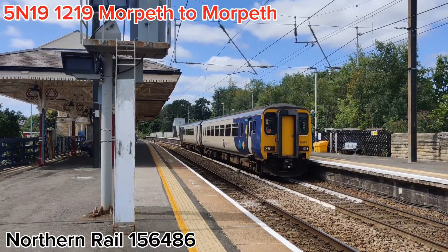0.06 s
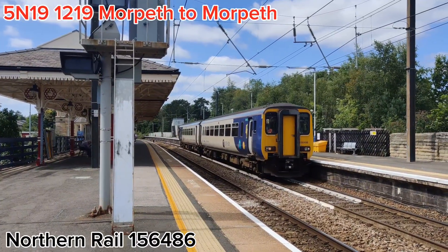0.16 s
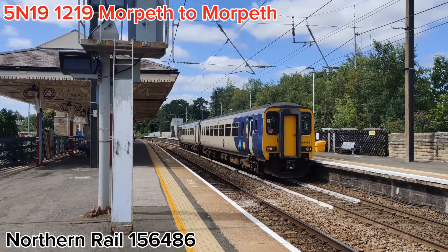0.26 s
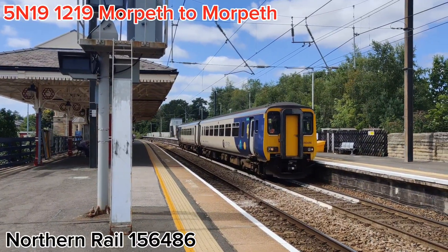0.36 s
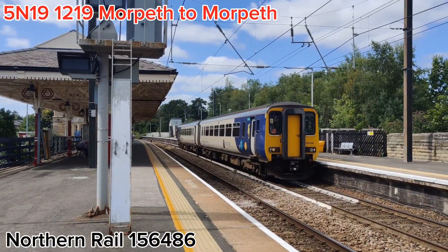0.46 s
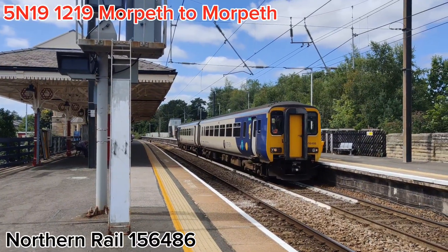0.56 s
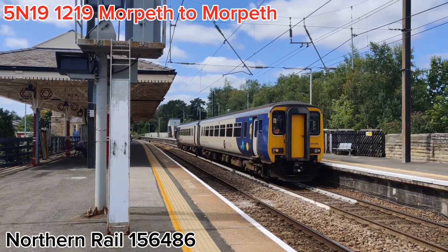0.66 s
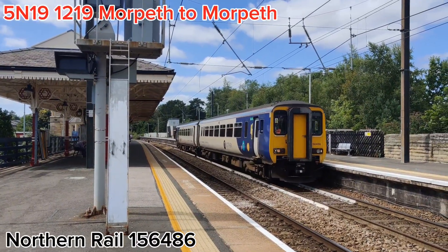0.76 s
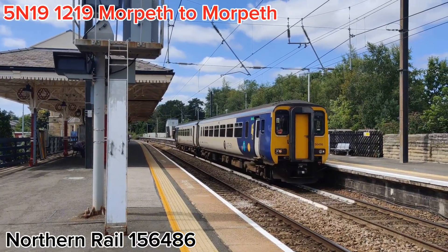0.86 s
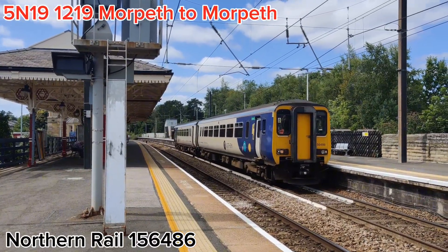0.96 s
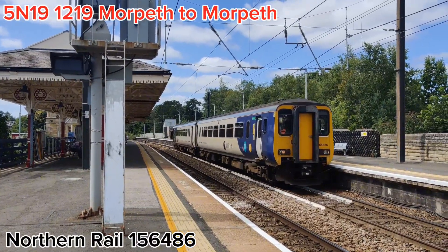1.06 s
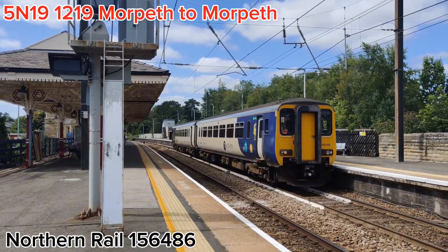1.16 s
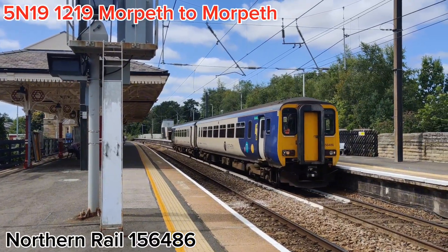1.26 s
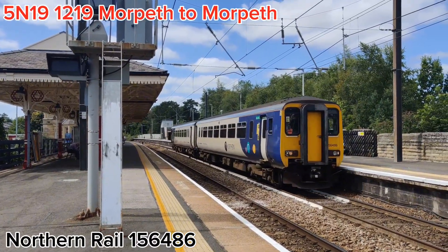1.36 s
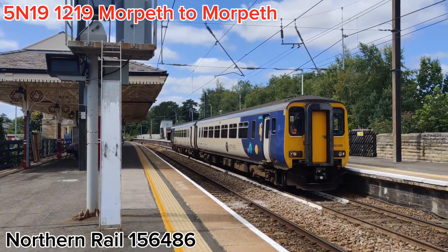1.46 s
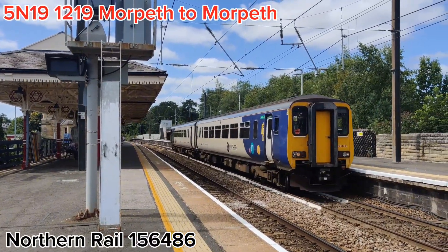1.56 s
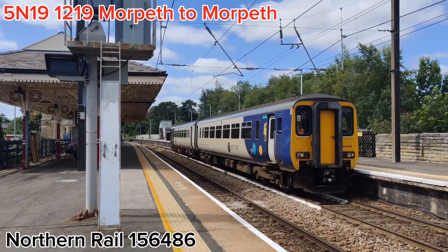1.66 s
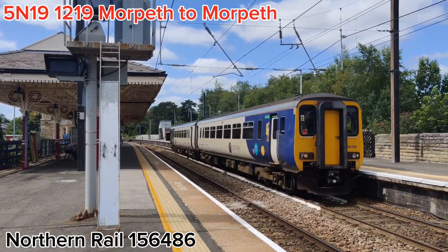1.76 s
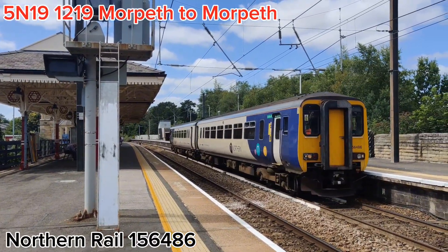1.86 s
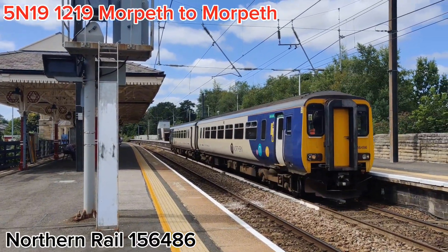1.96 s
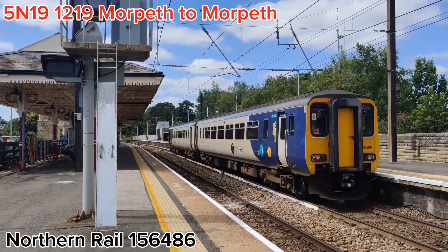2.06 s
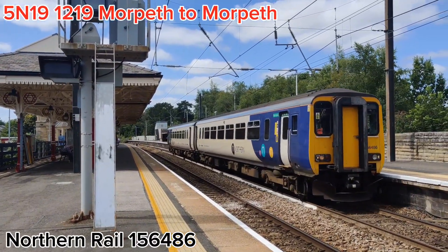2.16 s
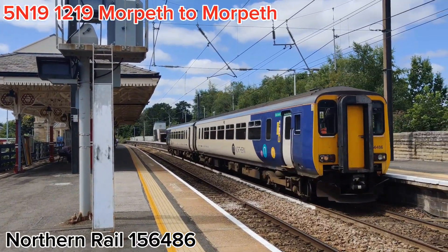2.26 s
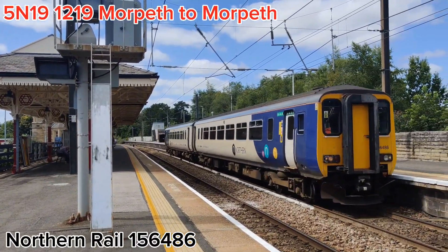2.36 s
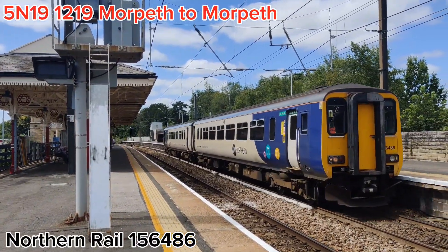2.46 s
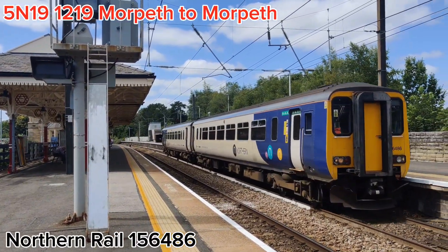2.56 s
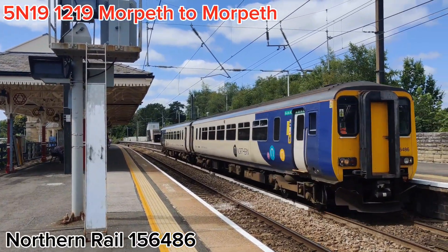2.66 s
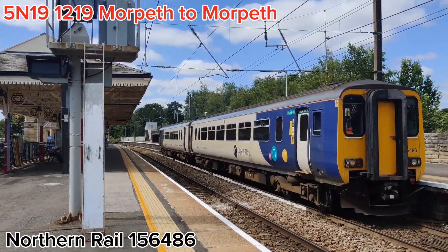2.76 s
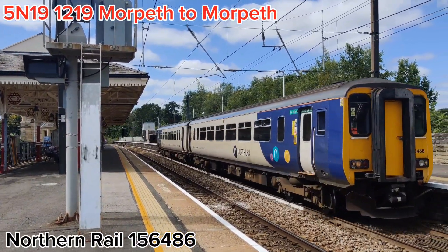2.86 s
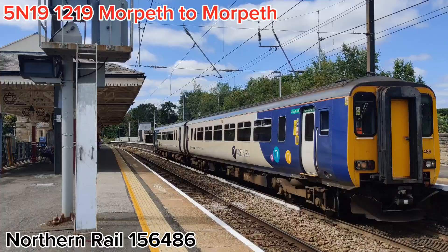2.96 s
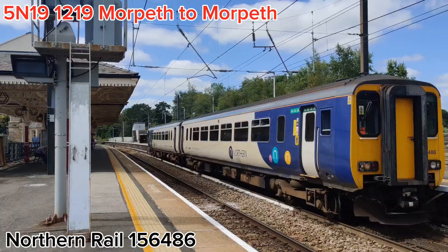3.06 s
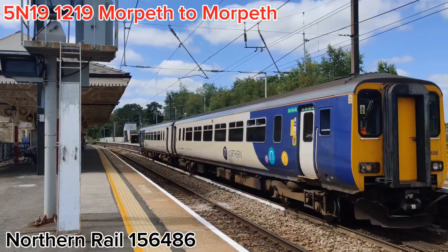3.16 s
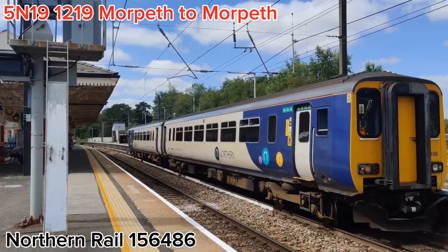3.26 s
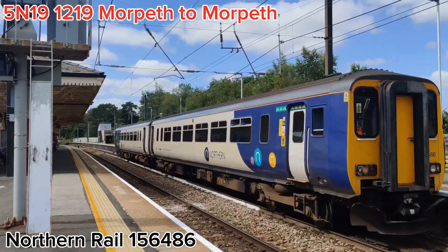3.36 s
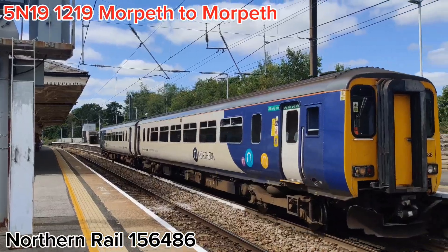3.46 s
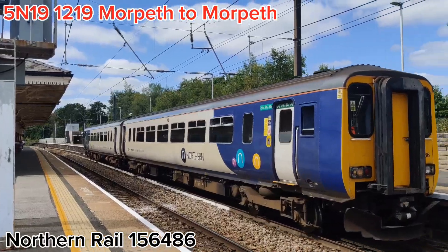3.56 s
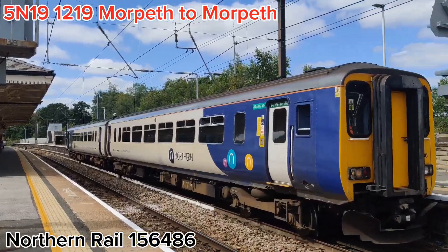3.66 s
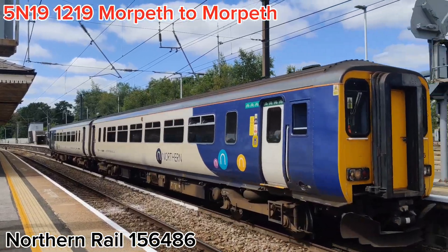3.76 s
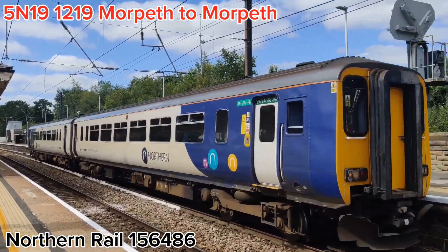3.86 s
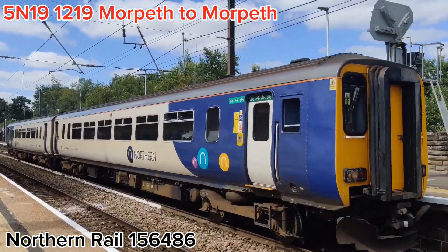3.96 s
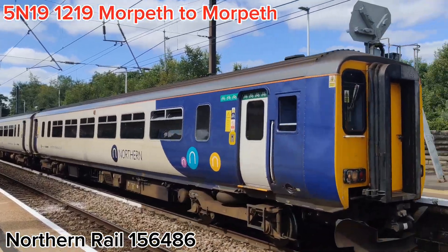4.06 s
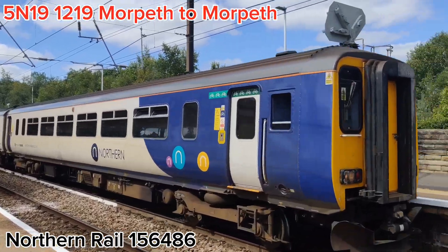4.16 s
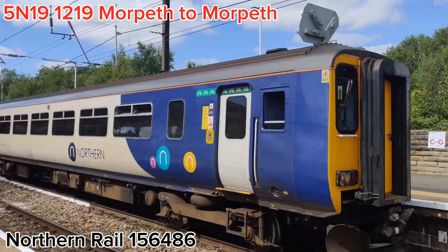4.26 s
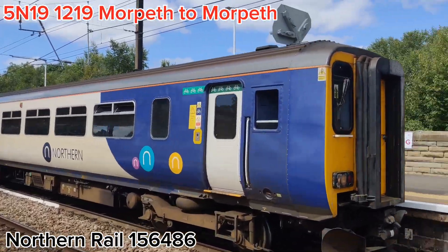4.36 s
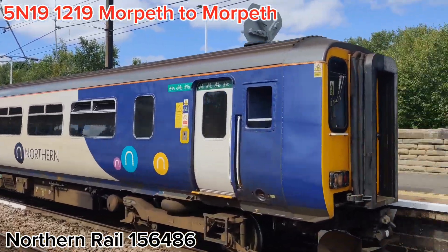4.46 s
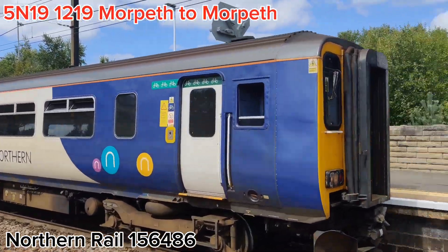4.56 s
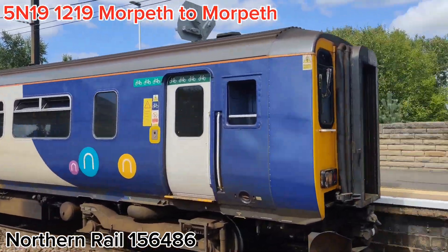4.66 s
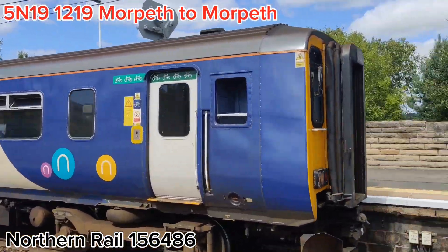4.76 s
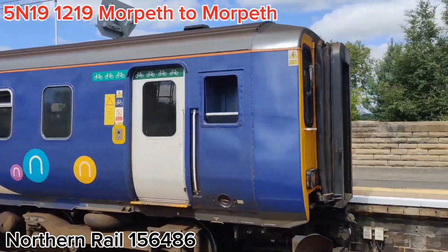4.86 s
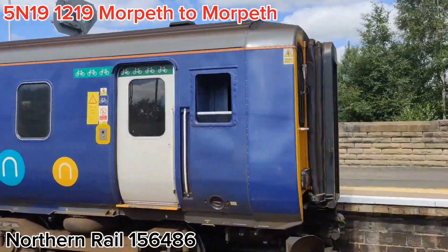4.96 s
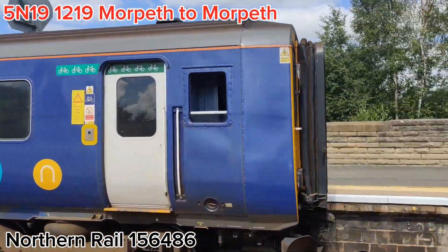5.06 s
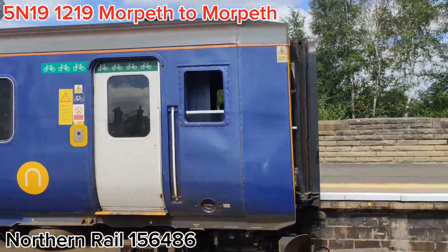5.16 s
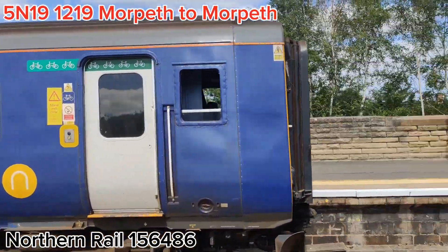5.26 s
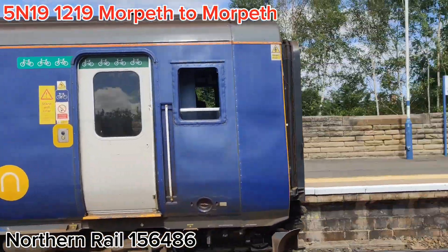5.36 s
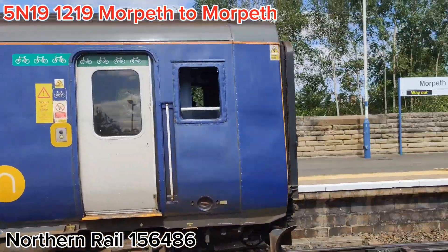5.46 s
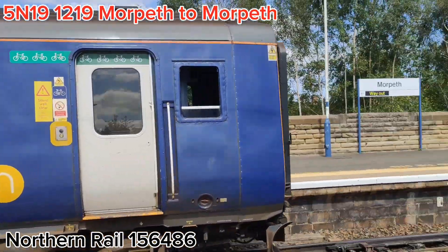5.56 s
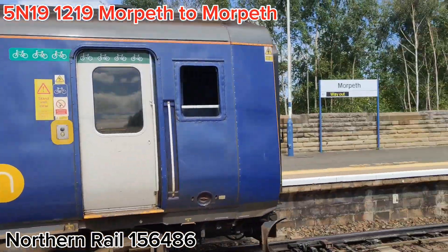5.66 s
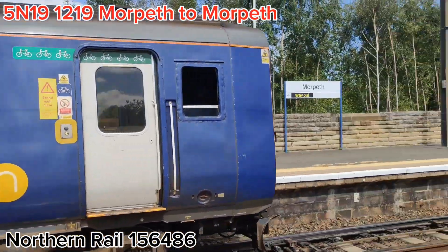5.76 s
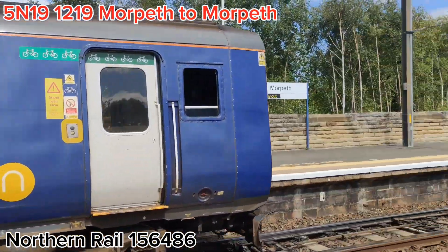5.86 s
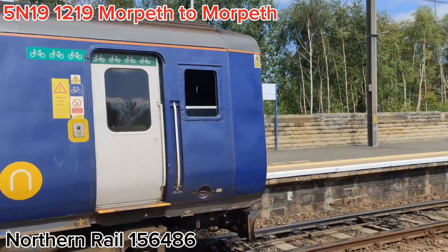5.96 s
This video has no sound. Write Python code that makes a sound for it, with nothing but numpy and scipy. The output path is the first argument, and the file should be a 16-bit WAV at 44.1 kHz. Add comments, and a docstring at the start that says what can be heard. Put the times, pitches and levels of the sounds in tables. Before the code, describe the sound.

A diesel passenger train approaches and slows past an outdoor station platform. Wind buffets the stereo microphone at first, over a roar of wheels on rails and a few faint puffs of air. The engine note sinks and swells into a deep, throbbing drone, joined by thin gear whines. A few sharp metal ticks follow, then a hiss of air and a loud clunk with brief squeaks as the train passes close.

```python
"""A deep, throbbing drone and a roar of wheels on rails: a two-car diesel train slows past a platform.
The throttle closes, so the two exhaust notes sink and beat, and the turbocharger's whistle falls.
The running gear whines, escaping air hisses, metal ticks, and blows under the train make a late clunk.
A breeze buffets the two small microphones, which stand a little apart."""
import sys
import numpy as np
from scipy import signal
from scipy.fft import rfft, irfft
from scipy.io import wavfile
from scipy.ndimage import uniform_filter1d

SR = 44100
rng = np.random.default_rng(int(sys.argv[2]) if len(sys.argv) > 2 else 0)


def materialize(psi):
    """Save the field psi as 16-bit PCM at rate SR to the path in sys.argv[1].

    A 1-D psi becomes a single channel; in a 2-D psi each row is a channel.
    """
    bounded = np.clip(np.atleast_2d(psi).T, -1, 1)
    quanta = np.round(bounded * 32767).astype(np.int16)
    wavfile.write(sys.argv[1], SR, quanta)


N = 265041
T = np.arange(N) / SR

# Tone colour of the breeze, the gusts and the shaking ground: pitch_hz, relative_db
BREEZE_SPECTRUM = [(12, 4), (30, 8), (50, 13.5), (90, 0.5), (160, -24), (400, -60), (1500, -95)]
GUST_SPECTRUM = [(12, -2), (30, 0), (60, -0.5), (120, -5), (200, -9.5), (350, -26.5), (700, -40),
                 (2500, -94)]
GROUND_SPECTRUM = [(15, -43), (33, 0), (42, 2), (58, -6), (75, -4), (105, 1), (135, -10), (300, -59),
                   (900, -97)]
# Strength of the breeze: time_s, left_db, right_db
BREEZE_LEVELS = [(0, -25, -27), (.7, -30, -28), (.85, -29.5, -32), (1.1, -29.5, -27), (1.6, -37, -28.5),
                 (2.5, -36, -37), (3.5, -33, -36), (4.5, -35, -37), (6.01, -52, -42)]
# Gusts that hit one microphone: middle_s, length_s, level_db, side (0 left, 1 right)
GUSTS = [(.01, 0.035, -10, 0), (.04, 0.055, -10, 1), (.085, .06, -16, 0), (.1, .05, -16, 1),
         (.15, .07, -21, 0), (.155, .05, -20, 1), (.22, .1, -16.5, 0), (.245, .07, -18.5, 1),
         (.43, .05, -23, 0), (.42, .08, -20, 1), (.56, .12, -25, 0), (.58, .07, -25, 1),
         (0.729, 0.14, -24, 1), (1.23, .22, -23, 1), (3.232, .073, -19.5, 0), (3.328, 0.14, -14, 0),
         (3.516, 0.087, -14.5, 0), (3.63, 0.15, -17.5, 1)]
# Strength of the ground rumble: time_s, level_db
RUMBLE_LEVELS = [(0, -26.5), (1, -37.5), (2, -38.5), (3, -39.5), (4, -26.5), (5, -31), (5.6, -25.5),
                 (6.01, -26)]

# Tone colour of the far roar, singing rails and front bogie (wheel frame): pitch_hz, relative_db
FAR_SPECTRUM = [(53, -38), (90, -0.5), (280, -4.5), (385, -19.5), (554, -3.5), (832, -10.5), (1030, -9),
                (1120, -9.5), (1360, -8.5), (3410, -21), (4230, -23), (5010, -18.5), (6080, -27.5),
                (14900, -50.5)]
RAIL_SPECTRUM = [(53, -28), (90, 1), (114, -28), (164, -10), (257, -3), (402, -18), (542, -8.5), (780, -15),
                 (1680, -12), (2700, -24), (3490, -25), (3960, -40), (4910, -40), (14900, -65.5)]
BOGIE_SPECTRUM = [(53, -31), (90, -5.5), (167, -4), (246, -12.5), (304, -8), (420, -16), (686, -11),
                  (1010, -16.5), (3340, -25), (4050, -34), (4910, -28.5), (6080, -38.5), (13100, -55.5),
                  (14900, -70)]
# Strength of those three roars: time_s, far_db, rails_db, bogie_db
ROAR_LEVELS = [(0, -37.5, -71, -45), (.5, -33.5, -38, -57), (1.2, -37, -37.5, -41.5),
               (2, -38.5, -35.5, -38), (2.8, -37, -33, -40), (3.6, -35, -32, -38.5), (4.5, -34, -31.5, -31),
               (5.2, -37, -34.5, -26.5), (6.01, -45, -34, -24.5)]
# How alike the roar is at the two microphones: pitch_hz, likeness (0 to 1)
ROAR_LIKENESS = [(60, 1), (290, 0.96), (630, 0.5), (1380, 0.36), (3020, 0.41), (6610, 0.31), (14500, 0.1)]

# Running-gear tones, swells of gear whine, and loose parts squeaking after the clunk:
# start_s, length_s, pitch_hz, wander_width_hz, level_db
RUNNING_GEAR_TONES = [(5.8, 0.38, 2000, 510, -38.5), (5.25, 0.55, 2500, 250, -45.5),
                      (5.4, 1.2, 3600, 39, -59), (4.03, .32, 2800, 8, -49), (4.3, 1.26, 110, 19.7, -35),
                      (4.1, 1.19, 192, 30.8, -37), (2.98, 1, 1240, 40, -47.5), (3.76, .8, 1350, 37, -49),
                      (2.56, 1.1, 3530, 150, -57), (4.25, .95, 3450, 200, -52),
                      (4.3, 1.15, 3230, 50, -53.5), (3.4, 0.46, 4700, 205, -65),
                      (5.05, 0.51, 5000, 300, -56)]
GEAR_WHINE = [(2.8, .45, 1652, 10, -45), (3.17, .6, 1641, 8, -42.5), (3.6, .6, 1636, 8, -46)]
SQUEAKS = [(5.75, .045, 6500, 20, -54), (5.782, .056, 6437, 25, -45.5), (5.797, .1, 5578, 22, -47)]
# Air escaping under the train: start_s, length_s, hiss_db, nozzle_whistle_db
HISSES = [(0.203, 0.082, -49, -80), (.34, 0.079, -50, -80), (.83, 0.3, -55, -71), (1.636, 0.37, -52, -66),
          (2.53, .12, -61, -70), (5.378, 0.53, -42, -54)]
# Tone colour of the air jet: pitch_hz, relative_db
JET_SPECTRUM = [(3000, -19), (5000, 9.5), (7000, 5.5), (10000, -3.5), (12000, -24), (14000, -13),
                (15000, -8)]
# Metal ticks: start_s, level_db, pitch_hz, left_minus_right_db, bright_edge_db
TICKS = [(4.0405, -26, 2600, 4.5, -16), (4.062, -16.5, 2700, 1, -14), (4.0724, -28, 2690, 2.0, -10),
         (4.138, -27, 2500, -2, -16), (4.1574, -21, 2800, 0, -4), (4.2272, -31, 3200, 0, -10),
         (5.8698, -22, 2800, 3.5, -10)]
# The quick blows that make up one clunk: start_s, level_db, brightness_db
CLUNK_BLOWS = [(5.7413, -36.5, 18.5), (5.7467, -26.5, 15.5), (5.751, -11, -3.5), (5.7602, -23.5, 6.5),
               (5.772, -19, 0), (5.792, -29, 2)]
# Ringing notes of the frame under the train: pitch_hz, relative_db, fade_s (time to drop 60 dB)
FRAME_NOTES = [(100, 6.5, 0.08), (137, 4.5, 0.059), (212, -2.5, 0.075), (287, 3.5, 0.046), (450, 1, 0.03),
               (690, 2, 0.035), (880, -3, 0.03), (1320, 2, 0.02), (1730, -2, 0.022), (1980, 7, 0.013),
               (2200, 5, 0.0076), (2450, 3, 0.014), (5250, -24, 0.03)]
# Tone colour of each blow's rattling crack: pitch_hz, relative_db
CRACK_SPECTRUM = [(150, -7), (500, 6), (900, -5), (2300, 5.5), (3200, -4), (5000, -18.5), (8000, -18),
                  (14000, -46)]

# Strength of the turbocharger and of the front exhaust: time_s, level_db
TURBO_LEVELS = [(0, -64.5), (1, -64), (1.3, -69), (1.85, -73), (2, -63), (3, -64.5), (3.4, -80),
                (6.01, -99)]
EXHAUST_LEVELS = [(.4, -46), (1.4, -34.5), (2, -33.5), (2.4, -28.5), (3.05, -24), (3.5, -23), (4.2, -25),
                  (5.1, -29.5), (5.6, -24.5), (6.01, -23.5)]
# Fuzzy extra notes in the exhaust: multiple (of the firing rate), relative_db
EXHAUST_MULTIPLES = [(2 / 3, -10), (3 / 2, -22), (1.5, -35), (1.5, -27), (3.5, -23.5), (6, -28)]

# Resonances of the microphones' small openings: pitch_hz, width_hz, boost_db
MIC_RESONANCES = [(570, 510, 0.5), (3533, 370, 6.5), (4660, 530, 3), (5060, 380, 4.5)]
# How the two microphones differ in tone: pitch_hz, left_minus_right_db
MIC_TILT = [(60, 0), (180, 0.5), (540, 0.5), (1610, 0.5), (4830, 3), (14500, -4)]

THROTTLE_SHUT_S = 0.94  # engines and turbocharger start to run down
FULL_HZ, FRONT_IDLE_HZ, REAR_IDLE_HZ = 72, 55, 60.3  # engine firing rates
FRONT_SLOWING_S, REAR_SLOWING_S = 1.4, 1.08  # time to fall about two thirds of the way to idle
SWING_START_S, SWING_END_S, FULL_LAG_SAMPLES = 3.33, 5.51, 20.4  # the train moves to the left


def gain_of(db):
    """Turns decibels into a number to multiply a signal by."""
    return 10 ** (np.asarray(db) / 20)


def unit_level(x):
    """Scales a signal to an average (rms) level of 1."""
    return x / np.sqrt(np.mean(x ** 2) + 1e-20)


def at_pitch(points, hz):
    """Looks up a table by pitch, blending between rows on a musical (log) scale."""
    pitches, values = np.transpose(points)
    return np.interp(np.log(hz + 1), np.log(pitches + 1), values)


def at_time(rows, column=1, t=T):
    """Looks up a table column by time, blending between rows."""
    return np.interp(t, np.transpose(rows)[0], np.transpose(rows)[column])


def shaped_noise(spectrum, channels):
    """Unrelated noises that share one tone colour."""
    shape = gain_of(at_pitch(spectrum, np.fft.rfftfreq(N, 1 / SR)))
    return unit_level(irfft(rfft(rng.standard_normal((channels, N))) * shape, N))


def wobble(shape, steps, axis=-1):
    """A random wiggle; smoothing over more steps makes it slower."""
    return unit_level(uniform_filter1d(rng.standard_normal(shape), size=steps, axis=axis))


def fuzzy_tone(noise, hz, width_hz):
    """Keeps a narrow band of noise around a pitch, which may glide."""
    spin = np.exp(2j * np.pi * np.cumsum(hz * np.ones(N)) / SR)
    r = np.exp(-np.pi * width_hz / SR)
    # Shift the pitch down to zero, smooth twice, then shift back.
    smoothed = signal.lfilter([(1 - r) ** 2], [1, -2 * r, r * r], noise / spin)
    return unit_level(2 * (spin * smoothed).real)


def swell(start_s, length_s, fade_share):
    """Fades in, holds and fades out."""
    progress = np.clip((T - start_s) / length_s, 0, 1)
    opening = np.minimum(np.minimum(progress, 1 - progress) / fade_share, 1)
    return np.sin(np.pi / 2 * opening) ** 2


def run_down(full_hz, slow_hz, slowing_s):
    """Holds steady until the throttle closes, then falls, quickly at first."""
    return slow_hz + (full_hz - slow_hz) * np.exp(-np.maximum(T - THROTTLE_SHUT_S, 0) / slowing_s)


def right_lag(t):
    """How many samples later the train's sound reaches the right microphone."""
    return FULL_LAG_SAMPLES * np.clip((t - SWING_START_S) / (SWING_END_S - SWING_START_S), 0, 1)


def move_left(x):
    """Makes a sound drift left by delaying the right channel."""
    return np.array([x, np.interp(np.arange(N) - right_lag(T), np.arange(N), x)])


def wind(lumpy_db=3, puffs_per_s=2.5, puff_s=0.092, puff_db=-36):
    """Swirling air hits each microphone separately: a low, lumpy breeze, random puffs and gusts."""
    lumps = gain_of(lumpy_db * wobble((2, N), steps=2500))
    strength = gain_of([at_time(BREEZE_LEVELS, column=1), at_time(BREEZE_LEVELS, column=2)])
    out = shaped_noise(BREEZE_SPECTRUM, channels=2) * lumps * strength
    buffet = shaped_noise(GUST_SPECTRUM, channels=2)
    buffet /= np.sqrt(uniform_filter1d(buffet ** 2, size=2500))  # hold its level steady
    puff_moments = rng.random((2, N)) < puffs_per_s / SR
    puffs = signal.oaconvolve(puff_moments, np.hanning(round(puff_s * SR))[None], "same")
    out += gain_of(puff_db) * puffs * buffet
    for middle_s, length_s, db, side in GUSTS:
        gust = swell(middle_s - length_s / 2, length_s, fade_share=0.28)
        out[round(side)] += gain_of(db) * buffet[round(side)] * gust
    return out


def ground_rumble():
    """The track and the ground shake with a low rumble."""
    return shaped_noise(GROUND_SPECTRUM, channels=1)[0] * gain_of(at_time(RUMBLE_LEVELS))


def rolling_roar(patchy_db=0.26, flicker_db=0.5):
    """Far roar, singing rails and front bogie: three broad noises take turns as the train nears."""
    slices, hz = N // 256 + 5, np.fft.rfftfreq(1024, 1 / SR)  # built in short slices of time
    t = np.arange(slices) * 256 / SR
    left_re, left_im, other_re, other_im, patches = rng.standard_normal((slices, 513, 5)).T
    left, other = left_re + 1j * left_im, other_re + 1j * other_im
    patches = uniform_filter1d(patches, size=14, axis=0)  # smooth across pitch
    patches = unit_level(uniform_filter1d(patches, size=16, axis=1))  # and across time
    flicker = wobble(slices, steps=8)
    power = 0
    for column, spectrum in enumerate((FAR_SPECTRUM, RAIL_SPECTRUM, BOGIE_SPECTRUM), start=1):
        colour = unit_level(gain_of(at_pitch(spectrum, hz)) * (hz > 50))
        power += np.outer(colour, gain_of(at_time(ROAR_LEVELS, column, t))) ** 2
    likeness = np.clip(at_pitch(ROAR_LIKENESS, hz), 0, 1)[:, None]
    delay = np.exp(-2j * np.pi * np.outer(hz, right_lag(t)) / SR)
    right = likeness * left * delay + np.sqrt(1 - likeness ** 2) * other
    strength = np.sqrt(power) * gain_of(patchy_db * patches + flicker_db * flicker)
    roar = signal.istft(np.array([left, right]) * strength, nperseg=1024, noverlap=768)[1]
    plain_level = np.std(signal.istft(left, nperseg=1024, noverlap=768)[1])
    return roar[:, :N] / plain_level


def singing_parts(rows, flutter_db):
    """Moving parts hum, whine or squeak: tones that wander in pitch and flutter in level."""
    out = np.zeros(N)
    for start_s, length_s, hz, width_hz, db in rows:
        span = slice(round(start_s * SR), min(round((start_s + length_s) * SR), N))
        drift, flutter = wobble((span.stop - span.start, 2), steps=600, axis=0).T
        tone = np.sqrt(2) * np.sin(2 * np.pi * np.cumsum(hz + width_hz / 2 * drift) / SR)
        fade = swell(start_s, length_s, fade_share=0.26)[span]
        out[span] += gain_of(db + flutter_db * flutter) * tone * fade
    return out


def air_hisses(nozzle_hz=12900, nozzle_width_hz=730):
    """Air escapes in bursts: a broad hiss with a high whistle from the nozzle."""
    jet = shaped_noise(JET_SPECTRUM, channels=2)
    nozzle = fuzzy_tone(rng.standard_normal((2, N)), nozzle_hz, nozzle_width_hz)
    return sum(swell(start_s, length_s, fade_share=0.22)
               * (gain_of(hiss_db) * jet + gain_of(whistle_db) * nozzle)
               for start_s, length_s, hiss_db, whistle_db in HISSES)


def metal_ticks(ring_s=0.0003, bounce_s=0.00068, bounce_db=-2, knock_hz=1300, knock_db=-5, edge_hz=4500):
    """Metal snaps for about one cycle, with a lower knock and a bright edge, then bounces once."""
    out, t = np.zeros((2, N)), np.arange(200) / SR
    for start_s, db, hz, pan_db, edge_db in TICKS:
        snap = np.sin(2 * np.pi * hz * t)
        snap += gain_of(knock_db) * np.sin(2 * np.pi * knock_hz * t)
        snap += gain_of(edge_db) * np.sin(2 * np.pi * edge_hz * t)
        snap *= np.e * t / ring_s * np.exp(-(t / ring_s) ** 2)
        snap += gain_of(bounce_db) * np.interp(t - bounce_s, t, snap)
        at = round(start_s * SR)
        out[:, at:at + len(t)] += np.outer(gain_of([db + pan_db / 2, db - pan_db / 2]), snap)
    return out


def frame_clunk(crack_db=-2, crack_s=0.014, rise_s=0.00042, left_lead_samples=8):
    """Blows ring the frame under the train; brighter blows bring more high notes and rattling crack."""
    length = 8000
    out, t = np.zeros(N + length), np.arange(length) / SR
    rattles = shaped_noise(CRACK_SPECTRUM, channels=len(CLUNK_BLOWS))[:, :length]
    for (start_s, blow_db, bright_db), rattle in zip(CLUNK_BLOWS, rattles):
        blow = gain_of(crack_db + bright_db) * rattle * np.exp(-t / crack_s)
        for hz, db, fade_s in FRAME_NOTES:
            note_db = db + bright_db * min(hz / 2000, 1) - 60 * t / fade_s
            blow -= gain_of(note_db) * np.sin(2 * np.pi * hz * t)
        out[round(start_s * SR):][:length] += gain_of(blow_db) * blow * (1 - np.exp(-t / rise_s))
    return np.array([out[left_lead_samples:][:N], out[:N]])


def turbo_whistle(full_hz=8720, slow_hz=6100, sag_hz_per_s=170, scatter_share=0.07):
    """The turbocharger's fuzzy whistle sags a little, then falls further once the throttle closes."""
    sag_hz = sag_hz_per_s * np.minimum(T, THROTTLE_SHUT_S)
    hz = run_down(full_hz, slow_hz, slowing_s=1.2) - sag_hz
    hz += scatter_share * (hz - slow_hz) * wobble(N, steps=50)
    return fuzzy_tone(rng.standard_normal(N), hz, width_hz=210) * gain_of(at_time(TURBO_LEVELS))


def engine_hum(multiple=9.15, level_db=-46.5):
    """A fuzzy hum, far above the firing rate, sinks with the engine speed as the train approaches."""
    hz = multiple * run_down(FULL_HZ, FRONT_IDLE_HZ, FRONT_SLOWING_S)
    hum = fuzzy_tone(rng.standard_normal(N), hz, width_hz=28)
    return gain_of(level_db) * hum * swell(start_s=1.8, length_s=1.4, fade_share=0.16)


def exhaust_drone(jitter_share=0.006, in_step_s=5.69, rear_in_step_db=-1.5, rear_rise_db_per_s=4):
    """Each engine's firing makes a low note; the two slip in and out of step, so the drone throbs."""
    front_hz = run_down(FULL_HZ, FRONT_IDLE_HZ, FRONT_SLOWING_S)
    rear_hz = run_down(FULL_HZ, REAR_IDLE_HZ, REAR_SLOWING_S)
    front_phase = 2 * np.pi * np.cumsum(front_hz * (1 + jitter_share * wobble(N, steps=3000))) / SR
    rear_lead = 2 * np.pi * np.cumsum(rear_hz - front_hz) / SR
    rear_lead -= np.interp(in_step_s, T, rear_lead)  # both fire together at this moment
    # The rear engine grows until it is nearly as loud as the front one.
    rear_gain = gain_of(np.minimum(rear_in_step_db + rear_rise_db_per_s * (T - in_step_s), 0))
    drone = np.sqrt(2) * (np.sin(front_phase) + rear_gain * np.sin(front_phase + rear_lead))
    noise = rng.standard_normal(N)
    for multiple, db in EXHAUST_MULTIPLES:
        drone += gain_of(db) * fuzzy_tone(noise, multiple * front_hz, width_hz=3)
    return drone * gain_of(at_time(EXHAUST_LEVELS))


def scene():
    """Adds up the passing train and the breeze, in left and right channels."""
    engines = exhaust_drone() + engine_hum() + turbo_whistle()
    gear = singing_parts(RUNNING_GEAR_TONES, flutter_db=3.5) + singing_parts(GEAR_WHINE, flutter_db=2.5)
    moving = move_left(engines + gear + ground_rumble())
    clatter = metal_ticks() + frame_clunk() + singing_parts(SQUEAKS, flutter_db=4.5)
    return rolling_roar() + moving + air_hisses() + clatter + wind()


def record(dry, ceiling=1.1, cutoff_hz=14950):
    """The microphones colour the sound, gently squash loud peaks and lose the highest treble."""
    hz = np.fft.rfftfreq(N, 1 / SR)
    boost_db = sum(db / (1 + (2 * (hz - pitch_hz) / width_hz) ** 2)
                   for pitch_hz, width_hz, db in MIC_RESONANCES)
    tilt_db = np.outer([0.5, -0.5], at_pitch(MIC_TILT, hz))
    heard = irfft(rfft(dry) * gain_of(boost_db + tilt_db), N)
    heard = ceiling * np.tanh(heard / ceiling)
    treble_cut = signal.firwin(1023, cutoff_hz, window=("kaiser", 10), fs=SR)
    return signal.oaconvolve(heard, treble_cut[None], "same")


dry = scene()
out = record(dry)
materialize(out)
```